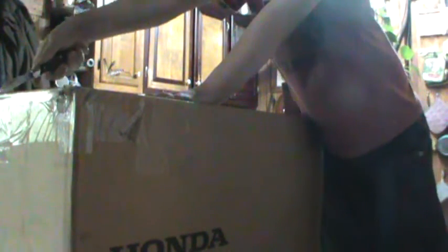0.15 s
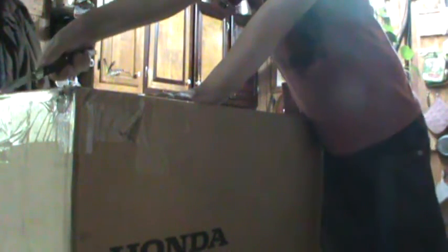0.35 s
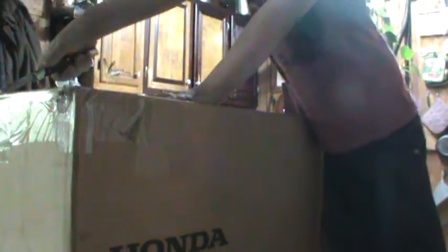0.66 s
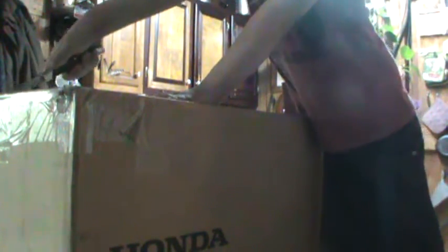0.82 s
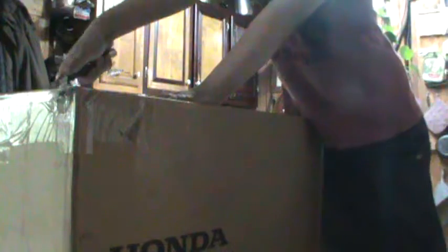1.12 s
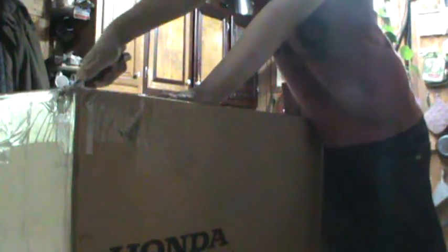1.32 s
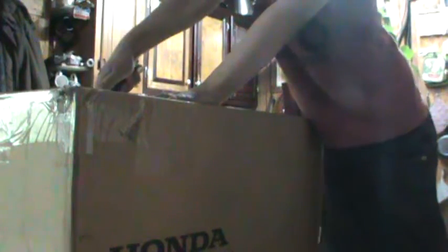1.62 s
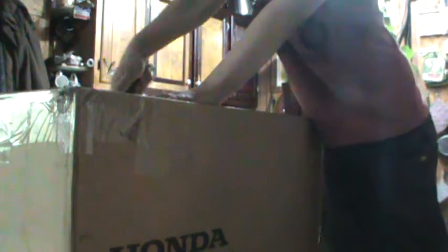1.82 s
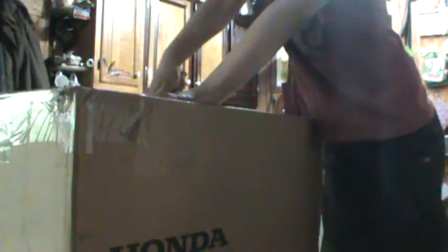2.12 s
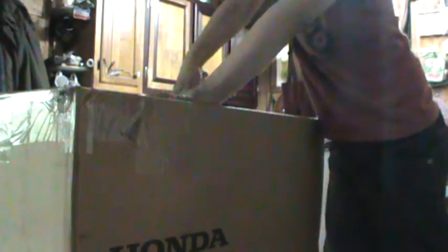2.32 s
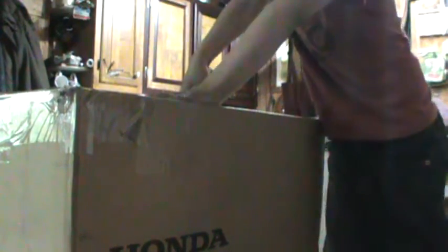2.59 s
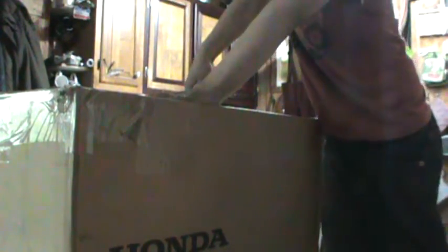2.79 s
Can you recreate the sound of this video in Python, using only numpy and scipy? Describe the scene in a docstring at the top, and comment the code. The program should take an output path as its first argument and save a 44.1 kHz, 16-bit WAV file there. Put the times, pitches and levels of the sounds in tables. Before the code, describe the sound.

A knife cuts a big taped cardboard carton in a lightly reverberant room with quiet low room tone. Faint clicks and hand shifts come from 0.6 s, a tape tick at 0.9 and a dull handle knock at 1.1. At 1.45 a sharp snap and hollow thud burst out, then a lull. From 1.8 to 2.9 the blade rasps in short, uneven strokes with boxy thumps, gradually softer.

```python
"""Cutting open a taped carton

A knife is worked along the taped seam of a big cardboard carton in a cluttered room. Tape snaps as
crackling bursts, the knife handle and carton boom as struck modes, and the blade, dragged in short
strokes, hisses as dense ringing clicks while slips shake the carton walls. Room tone lies beneath;
a near surface sends back an early echo, followed by a diffuse tail."""
import sys
import numpy as np
from scipy import signal
from scipy.fft import rfft, irfft, next_fast_len
from scipy.io import wavfile

SR = 44100
rng = np.random.default_rng(int(sys.argv[2]) if len(sys.argv) > 2 else 0)


def wav_out(sig):
    """Save sig, one row per channel (or a flat mono array), as 16-bit PCM at SR to the path in sys.argv[1]."""
    wavfile.write(sys.argv[1], SR, np.round(np.clip(np.atleast_2d(sig).T, -1, 1) * 32767).astype(np.int16))


N = 130095


def amp(db):
    """Decibel law: level in dB to amplitude gain."""
    return 10 ** (np.asarray(db) / 20)


def rms_one(x):
    """Power normalisation: scale to rms 1."""
    return x / np.sqrt(np.mean(x ** 2) + 1e-20)


def lowpass(x, order, hz):
    """Butterworth attenuation above a cutoff."""
    return signal.sosfilt(signal.butter(order, hz, fs=SR, output="sos"), x)


def highpass(x, order, hz):
    """Butterworth attenuation below a cutoff."""
    return signal.sosfilt(signal.butter(order, hz, "high", fs=SR, output="sos"), x)


def peak(x, hz, q):
    """Resonance: the narrow band of x around one frequency."""
    return signal.lfilter(*signal.iirpeak(hz, q, SR), x)


def colour(x, points):
    """Minimum-phase filtering: the folded cepstrum of a curve through (f/Hz, level/dB) points."""
    size = 4096
    hz, db = np.transpose(points)
    bins_hz = np.arange(size // 2 + 1) * SR / size
    log_gain = np.interp(np.log(bins_hz + 1), np.log(hz), db) * np.log(10) / 20
    cepstrum = irfft(log_gain)
    cepstrum[1:size // 2] *= 2
    cepstrum[size // 2 + 1:] = 0
    response = irfft(np.exp(rfft(cepstrum)))
    response = np.broadcast_to(response, x.shape[:-1] + (size,))
    return signal.fftconvolve(x, response, axes=-1)[..., :N]


def ring(clicks, hz, t60):
    """Damped oscillator: a unit click starts a decaying sine of height 1."""
    radius, angle = amp(-60 / (t60 * SR)), 2 * np.pi * hz / SR
    feedback = [1, -2 * radius * np.cos(angle), radius * radius]
    return signal.lfilter([0, np.sin(angle)], feedback, clicks + 1e-18)


def grains(rate, spread_db):
    """Shot noise: random clicks of uneven size and sign, at a mean rate per second; rms 1."""
    sizes = amp(spread_db * np.minimum(rng.exponential(1, N), 5)) * rng.choice([-1, 1], N)
    return rms_one(sizes * (rng.random(N) < rate / SR))


def wake(hz, centre_hz, octaves):
    """Selective excitation: a Gaussian in octaves gives the share of a blow that reaches a mode."""
    return np.exp(-.5 * (np.log2(hz / centre_hz) / octaves) ** 2)


def lean(k, width):
    """Level-difference stereo: left and right gains, successive pairs of items leaning opposite ways."""
    return 1 + width * np.cos(np.pi * (np.asarray(k) // 2)) * np.array([[1], [-1]])


# spectrum of room tone and hiss: (f/Hz, relative level per Hz/dB)
AIR_SPECTRUM = [(12, -51), (20, -20), (63, 2.5), (81, -12), (116, 5), (163, -9.5), (222, -3), (347, -17),
                (377, -12), (718, -17.5), (1000, -18), (1120, -19), (1570, -22.5), (3070, -26.5),
                (16000, -36)]
# left-right likeness of the room tone: (f/Hz, correlation from 0 to 1)
AIR_LIKENESS = [(60, 1.0), (180, 1), (550, 0.82), (1650, 0.035), (4970, 0.21), (15000, 0.99)]
AIR_DB = -50.5   # rms over both sides


def air():
    """Partial coherence: shared and opposed noises set how alike the steady room tone is on both sides."""
    hz, alike = np.transpose(AIR_LIKENESS)
    alike = np.clip(alike, 0, .999)
    noise = colour(rng.standard_normal((2, N)), AIR_SPECTRUM)
    mid = colour(noise[0], np.c_[hz, 10 * np.log10(1 + alike)])
    side = colour(noise[1], np.c_[hz, 10 * np.log10(1 - alike)])
    return amp(AIR_DB) * rms_one(mid + side * [[1], [-1]])


ECHO_S, ECHO_DB = 0.0095, -26.5
ROOM_T60_S, ROOM_DB, FAST_GAIN = 0.31, -39, 1.88   # time of the slow decay, tail level, fast share
ROOM_LOW_HZ, WALL_CUT_HZ = 155, 21000


def room(x):
    """Reverberation: one early echo, then slow and fast exponential noise decays, separate on each side."""
    t = np.arange(int(.5 * SR)) / SR
    noise = rng.standard_normal((2, 2, len(t))) * (t > ECHO_S)
    slow = lowpass(noise[0], 1, WALL_CUT_HZ) * amp(-60 * t / ROOM_T60_S)
    fast = FAST_GAIN * noise[1] * amp(-110 * t / ROOM_T60_S)
    response = highpass(amp(ROOM_DB) * (slow + fast), 2, ROOM_LOW_HZ)
    response[:, int(ECHO_S * SR)] += amp(ECHO_DB)
    return signal.fftconvolve(x, response, axes=1)[:, :N]


# hands shifting on the carton before the cut: (t/s, low hiss level/dB,
# carton mode level/dB in four ranges lowest first, high hiss level/dB)
SHIFT = [(0.05, -67, -70, -65, -56.5, -57, -65), (0.472, -73, -69, -68, -64.5, -66, -66.5),
         (0.692, -71, -62, -80, -55, -77, -66.5), (0.808, -63, -77, -66, -56, -58, -65),
         (0.966, -59.5, -58, -53, -49, -70, -63), (1.072, -62, -61, -40.5, -53, -44, -65.5),
         (1.342, -58.5, -52, -59, -53.5, -57, -65), (1.45, -62, -38, -55, -37.5, -59, -59)]
# dragging the blade: same columns (t/s, level/dB six times)
DRAG = [(1.454, -30, -42, -26, -14, -47, -29), (1.468, -28.5, -24, -12, -20, -50, -33.5),
        (1.494, -36, -42, -23, -26.5, -50, -41), (1.502, -36, -40, -23, -26, -60, -38),
        (1.525, -43.5, -26, -24.5, -33.5, -58, -50), (1.576, -70, -49, -57, -73, -70, -70),
        (1.626, -60, -62, -50, -46.5, -74, -65.5), (1.676, -76, -58, -79, -78, -88, -62),
        (1.682, -53, -65, -62, -86, -69, -63), (1.706, -71, -68, -45, -47, -69, -64),
        (1.722, -64, -69, -52, -51, -67, -61), (1.772, -54.5, -46, -46, -48.5, -47, -62),
        (1.806, -56, -62, -48, -47.5, -46, -59), (1.825, -42, -51, -47, -30, -33, -47.5),
        (1.856, -45, -60, -67, -34.5, -36.5, -49), (1.88, -36.5, -48, -58, -29, -22, -45),
        (1.906, -39, -52, -49, -24, -61, -45), (1.923, -32, -53, -27, -25.5, -45, -41),
        (1.944, -40.5, -32, -22.5, -27, -54, -48), (1.986, -63, -49, -34, -42.5, -59, -53),
        (2.009, -45.5, -37, -32, -32, -56, -50.5), (2.036, -56, -32, -54, -38.5, -51, -57.5),
        (2.063, -43, -34, -26, -25.5, -49, -44), (2.089, -53, -37, -20, -38, -59, -51),
        (2.109, -50, -44, -47, -29, -13, -56), (2.125, -53, -35, -30, -38.5, -48, -54),
        (2.156, -47, -47, -28, -31, -52, -52.5), (2.191, -49, -36, -24, -34, -59, -52),
        (2.21, -53, -38, -33, -50, -37, -60), (2.222, -51, -38, -32, -36.5, -62, -56),
        (2.256, -48.5, -43, -43, -55, -66, -56.5), (2.274, -44, -44, -24, -48, -25, -49),
        (2.284, -37.5, -52, -15, -24.5, -53, -45), (2.305, -44.5, -50, -27.5, -40, -37, -49.5),
        (2.378, -43.5, -27, -33, -36.5, -34.5, -46.5), (2.41, -49, -28, -34.5, -39.5, -47, -54),
        (2.428, -50, -46, -52, -31.5, -36, -55), (2.44, -63, -56, -51, -59, -68, -58.5),
        (2.482, -61, -55, -76, -55, -70, -67), (2.516, -45.5, -30, -31, -34.5, -29.5, -47),
        (2.556, -48, -27, -34, -36, -44, -49.5), (2.632, -58.5, -66, -52, -56.5, -60, -64),
        (2.656, -46.5, -50, -42, -37.5, -45, -50), (2.674, -49.5, -76, -31, -42.5, -62, -54),
        (2.716, -50.5, -51, -41, -39, -71, -50.5), (2.748, -50.5, -45, -38.5, -43.5, -43, -54.5),
        (2.818, -43.5, -31, -35, -34.5, -48, -42.5), (2.84, -48.5, -39, -29, -42.5, -46, -52.5),
        (2.916, -57, -59, -67, -47.5, -63, -63), (2.95, -61, -54, -59, -56, -73, -61)]


def drag(column):
    """Amplitude envelope: one column's levels joined by straight lines in dB, shifting then dragging."""
    rows = np.r_[SHIFT, DRAG]
    return amp(np.interp(np.arange(N) / SR, rows[:, 0], rows[:, column]))


# blows on the carton: (t/s, relative level/dB, centre of the modes woken f/Hz, width/octaves,
# share of the free ringing time left by the hands, rise/s)
BLOWS = [(0.636, -35, 333, 1, 0.78, 0.00081), (0.836, -28, 121, 0.46, 0.28, 0.002),
         (0.922, -17.5, 355, 0.8, 0.7, 0.00089), (0.932, -23, 254, 0.58, 1, 0.005),
         (1.073, -18, 327, 0.22, 0.78, 0.0012), (1.122, -13.5, 594, 0.77, 0.87, 0.013),
         (1.445, -4.5, 496, 1, 0.36, 0.00047), (1.453, -5.5, 890, 0.4, 0.41, 0.00078),
         (1.455, 3, 210, 0.42, 0.39, 0.0056), (1.824, -9.5, 500, 0.15, 0.66, 0.0025),
         (1.918, -5.5, 552, 0.15, 1, 0.0022), (1.934, -30, 190, 0.39, 0.35, 0.0032),
         (2.004, -14, 447, 0.27, 0.78, 0.0034), (2.06, -5, 126, 0.34, 0.95, 0.0022),
         (2.151, -5, 121, 0.35, 0.83, 0.0018), (2.279, -1.5, 203, 0.35, 0.41, 0.00075),
         (2.303, -26, 200, 0.99, 0.55, 0.003), (2.511, -21, 394, 0.62, 0.26, 0.00072),
         (2.52, -7.5, 153, 0.37, 0.48, 0.002), (2.538, -9, 125, 0.2, 0.95, 0.0047)]
# modes of carton walls and air: (f/Hz, relative level/dB, free t60/s)
CARTON = [(63, 0, 0.11), (123.7, -6, 0.34), (193, 0, 0.11), (224.4, -1, 0.089), (294.5, 0, 0.068),
          (355, 2, 0.039), (378.4, -7, 0.13), (435, 1, 0.045), (510.6, 2, 0.044), (601, -13.5, 0.086),
          (667.7, -8.5, 0.075), (776.4, -5, 0.047), (811, -6.5, 0.055), (879, -7.5, 0.083),
          (993, -11, 0.063), (1220, -39, .04), (1457, -6, 0.027)]
# borders of the four mode ranges: f/Hz
SPLIT_HZ = [150, 260, 1100]
# how strongly slips shake each range: relative level/dB
SHAKE_DB = [-26.5, -31, -29, -26]
SLIPS_PER_S, SLIP_SPREAD_DB = 1500, 2
BLOW_DB, BLOW_SPREAD_DB = -5.5, 3.2   # gain common to all blows, chance unevenness of each mode
CARTON_WIDTH, CARTON_CUT_HZ = 0.12, 112   # lean of the modes to either side, bass cutoff


def carton():
    """Modal superposition: blows wake modes near their centre; slips of blade and hands shake all modes."""
    out = np.zeros((2, N + SR))
    slips = [grains(SLIPS_PER_S, SLIP_SPREAD_DB) for _ in range(2)]
    chance = rng.normal(0, BLOW_SPREAD_DB, (len(BLOWS), len(CARTON)))
    hz, level_db, t60 = np.array(CARTON).T[:, :, None]
    t, index = np.arange(SR // 2) / SR, np.arange(len(CARTON))
    sign = (-1.) ** index[:, None]   # neighbouring modes in opposite polarity
    sides = lean(index, CARTON_WIDTH)
    for (s, db, centre_hz, octaves, share, rise), uneven_db in zip(BLOWS, chance):
        decay = amp(level_db + uneven_db[:, None] - 60 * t / (t60 * share))
        modes = sign * decay * wake(hz, centre_hz, octaves) * np.sin(2 * np.pi * hz * t)
        onset = 1 - np.exp(-t / rise)
        start = int(s * SR)
        out[:, start:start + len(t)] += amp(db + BLOW_DB) * onset * (sides @ modes)
    for k, (hz, level_db, t60) in enumerate(CARTON):
        group = np.searchsorted(SPLIT_HZ, hz)
        shaken = ring(drag(2 + group) * slips[k % 2], hz, t60)
        out[:, :N] += (-1) ** k * lean(k, CARTON_WIDTH) * amp(level_db + SHAKE_DB[group]) * shaken
    return highpass(out[:, :N], 2, CARTON_CUT_HZ)


# knife handle knocks: (t/s, relative level/dB, centre of the modes woken f/Hz, width/octaves)
KNOCKS = [(1.068, -26.5, 740, 0.67), (1.072, -30.5, 1350, 0.71), (1.124, -8.5, 1146, 0.84),
          (1.1291, -12.5, 1050, 0.38), (1.139, -18.5, 960, 0.44), (1.343, -46, 840, 1.0),
          (1.704, -40, 953, 0.65), (2.108, -15, 1450, 0.54), (2.2072, -24.5, 1330, 0.28)]
# modes of the handle and the panel under it: (f/Hz, relative level/dB, t60/s before the cap below)
HANDLE = [(586, -24, .05), (633, 0, .045), (880, -1, 0.062), (1093, 3, 0.046), (1205, 0, .03),
          (1287, 5, 0.019), (1401, -1.5, 0.028), (1660, -2.5, 0.0088), (2030, -2.5, 0.015),
          (2440, -5, 0.025), (3230, -2, 0.018), (3850, 1.5, 0.011)]
HANDLE_LONGEST_S = .022   # cap on t60
KNOCK_DB, KNOCK_SPREAD_DB, KNOCK_CUT_HZ = -6, 1.5, 4500   # common gain, chance unevenness, cutoff
SCATTER_DB = 14.5   # thud clicks relative to the knock levels


def scatter():
    """Diffuse scattering: the panel throws a broad, unpitched thud of each knock into the room only."""
    clicks = np.zeros(N)
    s, db = np.transpose(KNOCKS)[:2]
    clicks[(s * SR).astype(int)] = amp(db + SCATTER_DB)
    band = signal.butter(2, [600, 2300], "band", fs=SR, output="sos")
    return signal.sosfilt(band, clicks + 1e-18)


def knocks():
    """Impulse excitation: short contacts ring the handle's damped modes."""
    s, db, centre_hz, octaves = np.transpose(KNOCKS)
    out = np.zeros(N)
    chance = rng.normal(0, KNOCK_SPREAD_DB, (len(KNOCKS), len(HANDLE)))
    for k, (hz, level_db, t60) in enumerate(HANDLE):
        clicks = np.zeros(N)
        strength = amp(db + KNOCK_DB + chance[:, k])
        clicks[(s * SR).astype(int)] = strength * wake(hz, centre_hz, octaves)
        out += (-1) ** k * amp(level_db) * ring(clicks, hz, min(t60, HANDLE_LONGEST_S))
    return lowpass(out, 2, KNOCK_CUT_HZ)


# tape snaps and blade ticks; the rows at 0.5743 and 0.944 are near echoes of the clicks before them:
# (t/s, peak level before the top cut/dB, left-right level/dB held within 6,
# burst length/s, tilt/dB per octave, first ringing f/Hz, second ringing f/Hz)
SNAPS = [(0.565, -42, 0, 0.0042, -6, 5800, 9000), (0.5743, -39, 6, 0.0046, -6.5, 5800, 7550),
         (0.635, -45, -3, 0.0033, -4, 2750, 1500), (0.9232, -15, 2, 0.0028, -5.5, 4080, 1600),
         (0.944, -30.5, -4, 0.0035, -2.5, 4140, 7800), (1.4267, -35.5, 0.0, 0.0044, -10, 2190, 3300),
         (1.434, -34, 6, 0.01, -2, 2460, 3300), (1.4437, -6, 1, 0.004, -4, 4200, 2100),
         (1.461, -16, 2, 0.004, -16, 4280, 3080), (1.465, -20, 2, 0.0052, -1, 5450, 2300),
         (1.5, -27, 2, 0.0053, -2, 4400, 2300), (1.6861, -27, 6, 0.00047, -1, 6400, 2960),
         (1.687, -53, 6, 0.00051, -5, 8000, 11500), (1.923, -23, 6, 0.0025, -5, 4720, 8300),
         (2.06, -29.5, 11, 0.0015, -10, 2740, 1470), (2.502, -39, 3, 0.0033, 11, 9000, 4000),
         (2.511, -44, 6, 0.006, 6, 1900, 7640), (2.6474, -40.5, 3, 0.0074, 2, 9000, 2720),
         (2.811, -28.5, -5, 0.0018, -10, 3700, 2030)]
# spectrum of a burst before its tilt: (f/Hz, relative level per Hz/dB)
SNAP_SPECTRUM = [(710, -25), (1200, -7.5), (2510, -1.5), (3740, -1), (4550, -0.5), (5970, 1.5), (6510, -1),
                 (8170, 3.5), (10000, 3.5), (11200, 1), (14000, -1), (16000, 8)]
SNAP_RING_DB, SNAP_RING_Q, SNAP_RISE_S = 10, 7, .0005   # the rise is shorter in the shortest bursts
SNAP_TAIL_DB, SNAP_TAIL_S = -19, 0.019   # crackle that follows each burst
SNAP_ECHO_DB, SNAP_ECHO_SMEAR_S, SNAP_CUT_HZ = -12, .0012, 13500


def snaps():
    """Transient noise and reflection: each row a crackling burst, repeated blurred by an uneven surface."""
    span = 2048
    out = np.zeros((2, N + SR))
    t = np.arange(span) / SR
    hz, shape_db = np.transpose(SNAP_SPECTRUM)
    smear = rng.standard_normal(256) * np.exp(-t[:256] / SNAP_ECHO_SMEAR_S)
    smear = smear / np.sqrt(np.sum(smear ** 2))
    for s, db, pan_db, length, tilt_db, *rings_hz in SNAPS:
        rise = np.minimum(t / min(SNAP_RISE_S, length / 4), 1) ** 2
        fall = np.exp(-(t / length) ** 3) + amp(SNAP_TAIL_DB) * np.exp(-t / SNAP_TAIL_S)
        burst = rng.standard_normal(span) * rise * fall
        ringing = sum(peak(burst, ring_hz, SNAP_RING_Q) for ring_hz in rings_hz)
        burst = burst + amp(SNAP_RING_DB) * ringing
        tilted_db = shape_db + tilt_db * np.log2(hz / 5000)
        points = np.c_[np.r_[400, hz], np.r_[shape_db[0] - 20, tilted_db]]
        sound = colour(burst, points)[:span]
        sides = amp(db + np.clip(pan_db, -6, 6) * np.array([[.5], [-.5]]))
        sound = sides * sound / np.abs(sound).max()
        echo = amp(SNAP_ECHO_DB) * signal.lfilter(smear, 1, sound)
        for lag, heard in (0, sound), (ECHO_S, echo):
            start = int((s + lag) * SR)
            out[:, start:start + span] += heard
    return lowpass(out[:, :N] + 1e-18, 4, SNAP_CUT_HZ)


PATCH_DB, PATCH_HZ = 3, 12   # rms wander and its cutoff


def patches(count):
    """Slow modulation: independent gains wander the rasp's colour as the card changes under the edge."""
    step = 64   # samples between control points
    pole = np.exp(-2 * np.pi * PATCH_HZ * step / SR)
    noise = rng.standard_normal((count, N // step + 502))
    slow = signal.lfilter([1], [1, -2 * pole, pole * pole], noise)[:, 500:]   # drop the settling
    place = np.arange(N) / step
    return [amp(PATCH_DB * np.interp(place, np.arange(len(row)), rms_one(row))) for row in slow]


# spectrum of the tearing before the blade's resonances: (f/Hz, relative level per Hz/dB)
HISS_SPECTRUM = [(590, -16), (1000, -2), (1140, -6), (1290, -8), (1650, -6), (2280, -7), (3620, -10.5),
                 (4730, -13), (5970, -15.5), (9280, -14.5), (16000, -33)]
# resonances of the blade: (f/Hz, width/Hz, lift level/dB)
BLADE = [(2560, 74, -0.5), (4320, 170, 4.5), (4720, 87, 6.5), (5580, 48, 8.5), (6560, 400, 3),
         (8300, 360, -3)]
FIBRES_PER_S, FIBRE_SPREAD_DB, FIBRE_CYCLES = 14000, 3, 10   # t60 of a fibre is 10 of its cycles
HISS_SPLIT_HZ, EDGE_WIDTH, BLADE_DB = 6000, 0.21, -0.5   # low-high border, lean to the sides, gain


def blade():
    """Granular fracture: fibres and tape part in dense clicks, each briefly ringing; the blade resonates."""
    clicks = grains(FIBRES_PER_S, FIBRE_SPREAD_DB)
    pitches = np.geomspace(1200, 15500, 24)
    dealt = rng.integers(0, 24, N)   # which pitch each click sounds
    tear = np.zeros((2, N))
    for k, (hz, gain) in enumerate(zip(pitches, patches(count=24))):
        fibres = rms_one(ring(clicks * (dealt == k), hz, FIBRE_CYCLES / hz))
        tear += fibres * np.sqrt(hz) * gain * lean(k, EDGE_WIDTH)
    tear = colour(tear, [(300, HISS_SPECTRUM[0][1] - 20)] + list(HISS_SPECTRUM))
    for hz, width, lift_db in BLADE:
        tear = tear + (amp(lift_db) - 1) * peak(tear, hz, hz / width)
    low = rms_one(lowpass(tear, 3, HISS_SPLIT_HZ))
    high = rms_one(highpass(tear, 3, HISS_SPLIT_HZ))
    return amp(BLADE_DB) * (drag(1) * low + drag(6) * high)


# phase between a pair of microphone ports: (f/Hz, lead of the left/rad)
PORTS = [(20, 0), (150, 0), (450, 0.38), (1120, 0.65), (2670, 0.66), (3620, 0.47), (4740, 0), (5080, 0.57),
         (6290, 0.53), (7060, 0.46), (8270, 0.65), (9560, 1), (11000, 0.52), (16200, 0.0)]


def ports(x):
    """Interaural-style phase difference: the two ports hear the sound slightly out of phase."""
    size = next_fast_len(N + 4096)
    hz, lead = np.transpose(PORTS)
    bins_hz = np.arange(size // 2 + 1) * SR / size
    turn = np.interp(np.log(bins_hz + 1), np.log(hz), lead) * np.array([[.5j], [-.5j]])
    return irfft(rfft(x, size) * np.exp(turn), size)[:, :N]


# left-right balance of knocks, carton and blade: (f/Hz, left-right level/dB)
PAN = [(200, -0.5), (380, -1.5), (700, -4), (1290, -3), (2380, -0.5), (4400, -2), (8120, 2.5), (15000, -1)]
KNOCK_ROOM_SHARE = .45   # share of the handle's ringing that reaches the room


def scene():
    """Superposition: the placed sources, their reverberation and the room tone add at the two ports."""
    knock = knocks()
    near = knock + carton() + blade()
    hz, db = np.transpose(PAN)
    left = colour(near[0], np.c_[hz, db / 2])
    right = colour(near[1], np.c_[hz, -db / 2])
    direct = np.array([left, right]) + snaps()
    to_room = direct - (1 - KNOCK_ROOM_SHARE) * knock + scatter()
    return ports(direct + room(to_room) + air())


CUTOFF_HZ = 16250


def record(dry):
    """Band limiting: a steep low-pass, 60 dB down from 500 Hz above the cutoff, removes the top."""
    return signal.sosfilt(signal.cheby2(12, 60, CUTOFF_HZ + 500, fs=SR, output="sos"), dry)


dry = scene()
out = record(dry)
wav_out(out)
```